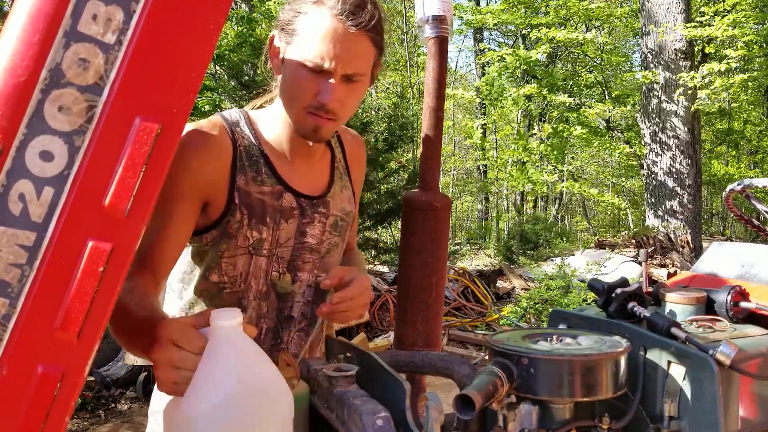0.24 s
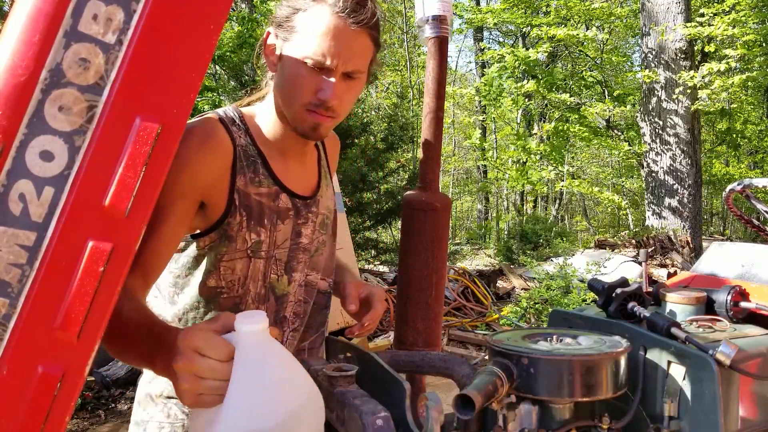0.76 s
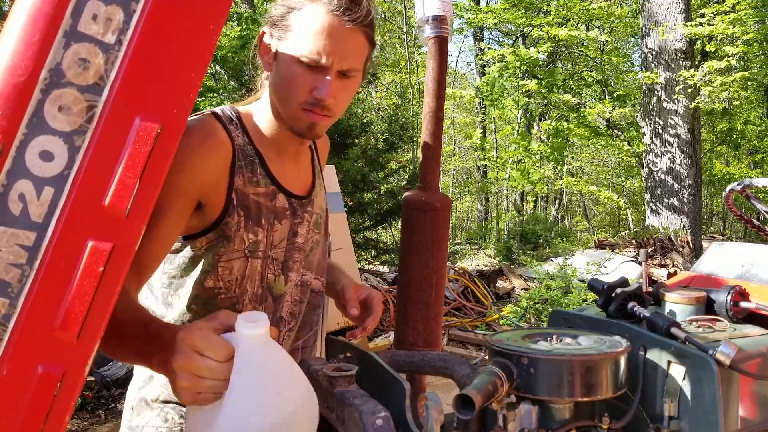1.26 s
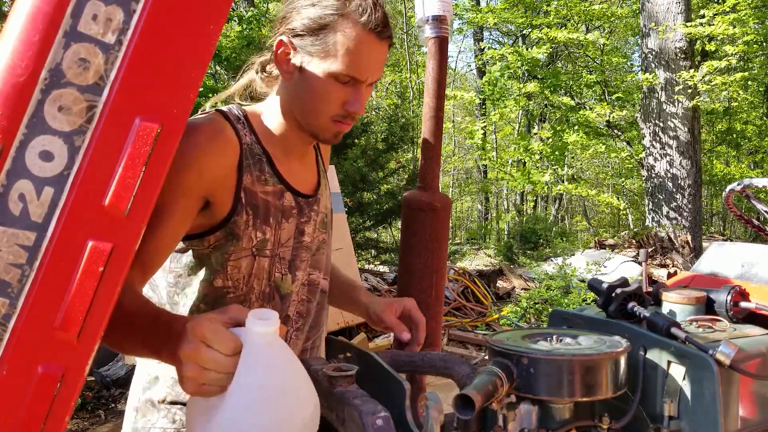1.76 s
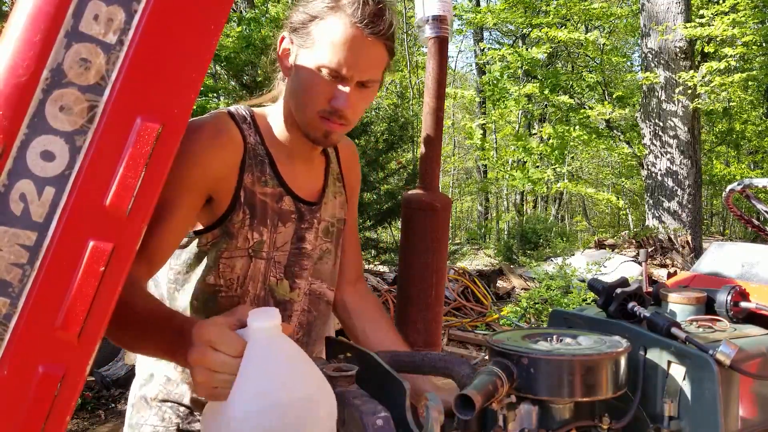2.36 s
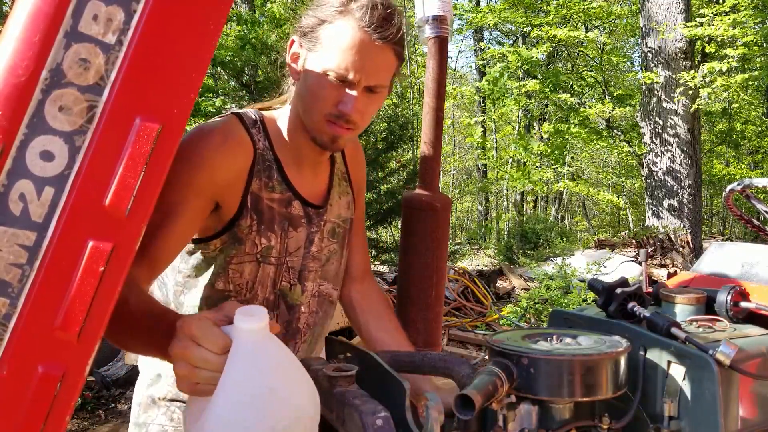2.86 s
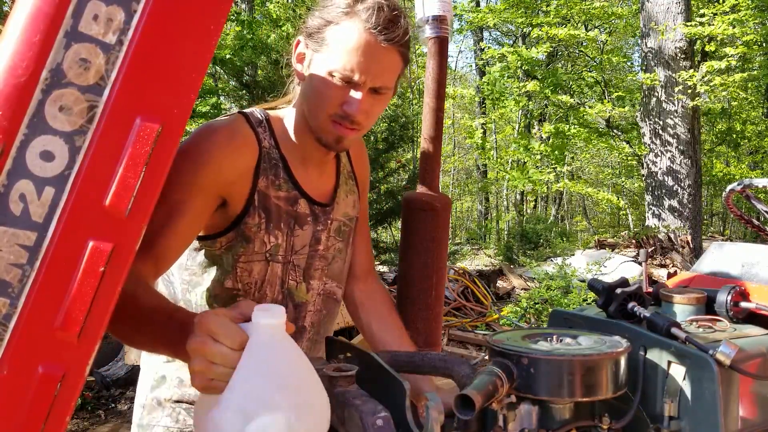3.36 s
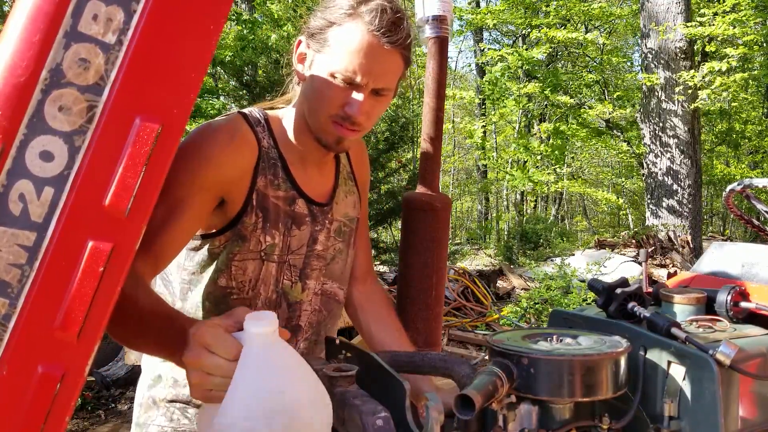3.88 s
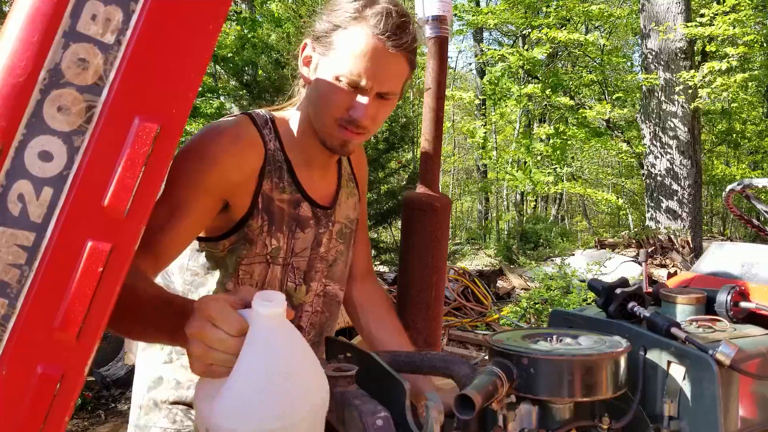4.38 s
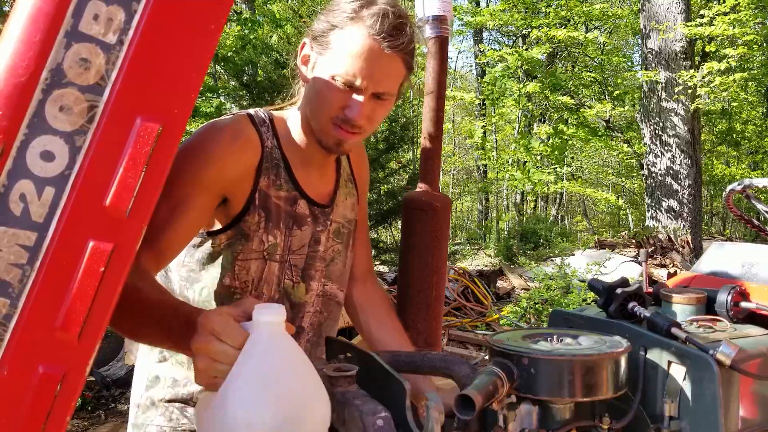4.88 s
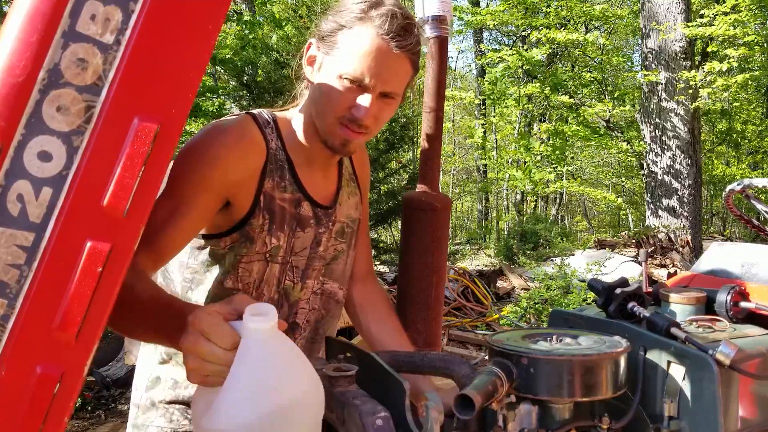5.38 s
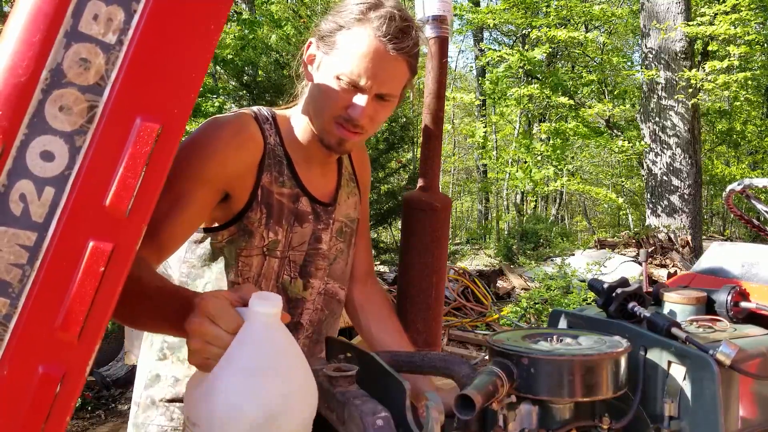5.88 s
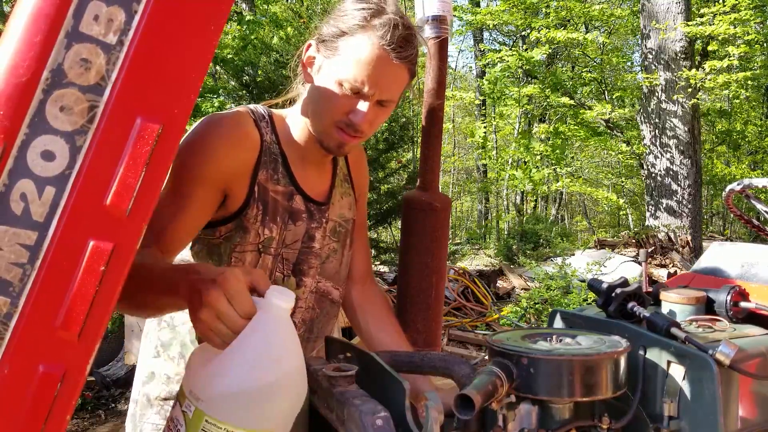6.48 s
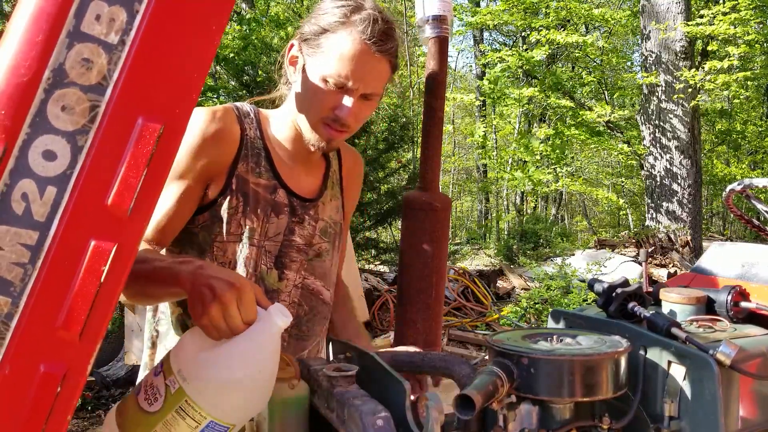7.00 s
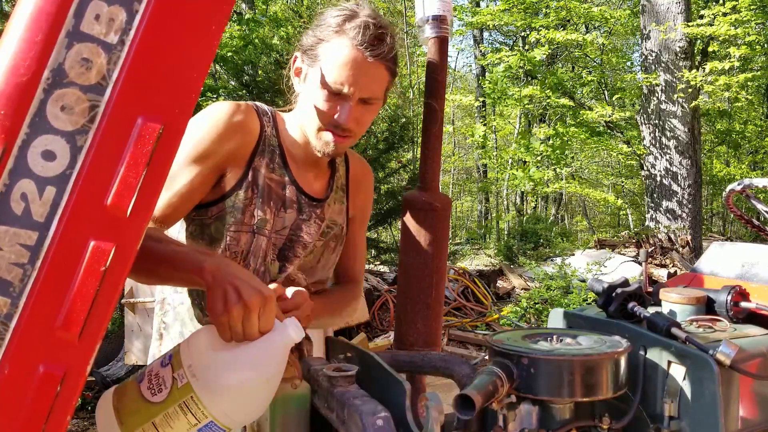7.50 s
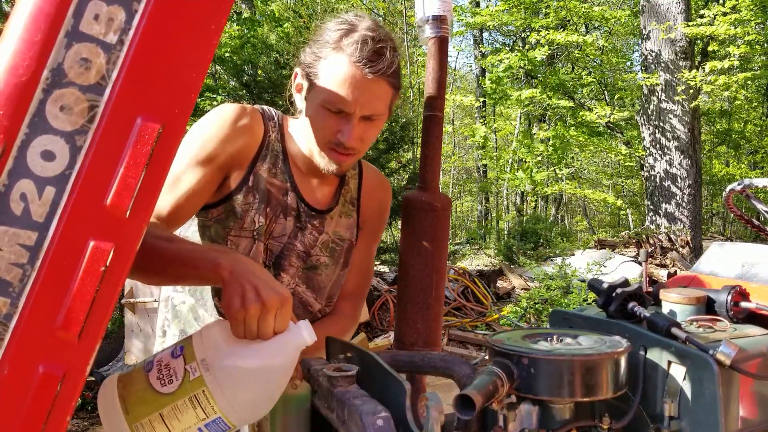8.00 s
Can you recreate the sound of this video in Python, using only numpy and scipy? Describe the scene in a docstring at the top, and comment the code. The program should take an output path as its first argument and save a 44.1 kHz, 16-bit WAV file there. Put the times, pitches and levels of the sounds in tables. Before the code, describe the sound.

A handheld plastic jug sloshes near the microphone, its waves breaking into ringing bubbles, plops and light foam fizz, with dull knocks of the plastic. Low wind gusts swell and buffet the microphone, strongest just before the sloshing ends. After a brief lull, a metal cap chatters onto a hollow hood with a sharp clank and short boom, leaving soft leaf rustle and thin bird chirps.

```python
"""Liquid swirled in a plastic jug slaps, bubbles and spatters about two and a half times a second:
swarms of ringing bubbles, bursts of noise and single plops follow each wave, over fizzing foam.
Then a metal cap is set down on a parked tractor's hood: a rattling clank of decaying modes and noise,
and a low boom. Outdoors behind it, shaped noise makes wind rumble on the microphone, leaf hiss, a faint
hum and blurred birdsong; gliding sines make a few thin chirps."""
import sys
import numpy as np
from scipy import signal
from scipy.fft import rfft, irfft, next_fast_len
from scipy.io import wavfile
from scipy.ndimage import uniform_filter1d

SR = 44100
rng = np.random.default_rng(int(sys.argv[2]) if len(sys.argv) > 2 else 0)


def unload_wav(signal):
    """Save mono or channel-first audio to the path in sys.argv[1] as 16-bit WAV at rate SR, clipped to [-1, 1]."""
    wavfile.write(
        sys.argv[1],
        SR,
        np.round(np.clip(np.atleast_2d(signal).T, -1, 1) * 32767).astype(np.int16),
    )


N = 363825
T = np.arange(N) / SR  # time in s

# colour of leaves and distant air: freq_hz, gain_db
LEAF_COLOUR = [(40, 7.5), (150, 5), (300, -0.5), (500, -3.5), (900, -3.5), (1400, -9), (2200, -15),
               (3000, -16), (4000, -13), (6000, -19.5), (8000, -24), (9800, -28.5), (11000, -36.5),
               (15500, -37.5)]
# slow drift of the breeze in the leaves: time_s, level_db
BREEZE = [(0, -52.5), (1, -50.5), (4.5, -50.5), (7.4, -51.5), (8.25, -53)]
# a faint hum that swells and fades: time_s, level_db
HUM_LEVEL = [(0, -65), (2, -63), (3, -58.5), (3.7, -53.5), (4.6, -53), (5.4, -67), (8.25, -67)]
# blurred phrases of a far bird: middle_s, half_length_s, level_db
SONG_PHRASES = [(0.684, 0.068, -63), (3.086, 0.18, -56.5), (4.98, 0.12, -59.5), (6.798, 0.046, -70)]
# thin falling bird notes: start_s, length_s, start_hz, end_hz, level_db
CHIRPS = [(0.274, 0.066, 7170, 6480, -49.5), (6.619, 0.097, 6630, 4840, -53.5),
          (7.984, 0.088, 7070, 5850, -53)]
# colour of the wind on the microphone: freq_hz, gain_db
WIND_COLOUR = [(10, -9), (25, 1), (55, -1), (75, -5), (100, -9.5), (140, -18.5), (200, -29), (300, -39),
               (500, -51), (1000, -63), (3000, -100)]
# strength of the wind before its flutter: time_s, level_db
GUSTS = [(0, -42.5), (1.0, -41), (1.25, -37), (1.8, -38.5), (2.25, -32.5), (2.9, -39), (3.05, -30),
         (3.95, -28.5), (4.1, -31.5), (4.6, -36.5), (4.9, -28), (5.5, -26), (6.1, -34), (6.6, -31.5),
         (7.0, -43), (7.3, -39), (7.7, -45), (8.25, -42)]
# single buffets of wind: middle_s, level_db
BUFFETS = [(0.16, -32), (0.535, -32), (3.16, -29.5), (3.68, -31), (5.335, -25), (5.9, -22.5), (6.34, -25)]
# the cap touches, tips over and shifts: start_s, force_db, hardness_db (of the bright crack)
CONTACTS = [(7.074, -35, 10), (7.079, -8, -7), (7.087, -5, 3.5), (7.090, 2, -1), (7.18, -35, 13),
            (7.295, -38, 10), (7.324, -33.5, 10.5)]
# ringing modes of cap and hood: freq_hz, level_db (relative), t60_s
RING_MODES = [(337, -25, 0.84), (555, -23, 0.43), (639, -28, 0.36), (715, -29, 0.26), (820, -13.5, 0.08),
              (917, -19, .13), (1160, -21, 0.12), (1232, -9, 0.086), (1402, -4, 0.13), (1454, -13, 0.072),
              (1710, -11, 0.068), (1890, -8, 0.034), (2078, -25, 0.11), (2360, -20, 0.21),
              (2564, -7.5, 0.059), (2840, -26, 0.079), (3200, -35, 0.088), (3710, -19.5, 0.063),
              (4301, -22, 0.098), (5300, -40, .1)]
# colour of each metal contact: freq_hz, gain_db
CRACK_COLOUR = [(100, -28), (350, -1), (600, -10), (900, 1.5), (1800, 2), (2700, -3), (3400, -9),
                (5800, -12), (8500, -20), (11000, -32), (15000, -47)]
# dull body of the hood under the blows: freq_hz, gain_db
THUD_COLOUR = [(80, -7), (210, -1), (340, 5), (480, 0), (700, -2), (900, -16), (1300, 0), (2000, -26),
               (5000, -43)]
# the jug's wall buckles with a soft low thump: start_s, level_db
THUMPS = [(2.517, -38.5), (2.868, -41), (2.955, -45), (3.276, -44.5), (3.641, -51), (3.731, -39),
          (4.396, -44), (4.537, -40), (5.895, -61)]
# the loudest plops: start_s, level_db, pitch_hz, spatter_db (relative to level_db)
PLOPS = [(0.407, -34.5, 4450, -23), (0.5566, -27, 2620, -22.5), (0.7886, -34.5, 1285, -12),
         (0.819, -31, 2350, -32), (0.9173, -32, 1770, -18), (1.254, -31.5, 1097, -20),
         (1.3089, -30.5, 4000, -20), (1.3244, -31, 3000, -31), (1.3823, -35, 1585, -19),
         (1.6357, -35, 1450, -10.5), (1.702, -31, 3560, -24), (1.729, -30, 3800, -30),
         (1.7699, -32, 3460, -27), (1.7998, -26.5, 2030, -15.5), (1.8124, -36, 1020, -8),
         (1.8314, -31.5, 3180, -24), (1.8916, -28.5, 2090, -18.5), (2.0657, -35.5, 2510, -9),
         (2.1001, -30.5, 2350, -16), (2.1161, -28, 3300, -33), (2.138, -29.5, 1390, -11),
         (2.3835, -32.5, 3770, -34), (2.5202, -31, 2420, -19), (2.9582, -43.5, 1050, -5.5),
         (3.1433, -31.5, 4050, -36), (3.268, -26.5, 2300, -30), (3.3782, -39.5, 3070, -5.5),
         (3.5254, -46, 1080, 1), (3.5643, -30, 1480, -17), (3.6401, -38, 990, -3),
         (3.9025, -32, 2620, -5.5), (4.0058, -31.5, 2400, -13.5), (4.1185, -39.5, 2570, -5.5),
         (4.338, -24.5, 3450, -34), (4.3974, -26.5, 3700, -17.5), (4.5166, -35.5, 1255, -35),
         (4.6843, -34.5, 1084, -15), (4.9871, -41, 2270, -4.5), (5.1173, -40.5, 2220, -0.5),
         (5.1442, -31, 2910, -29), (5.3373, -31, 3900, -13), (5.6755, -41, 7350, -6.5),
         (6.0387, -45.5, 3750, -1.5), (6.1654, -31.5, 1490, -24)]
# colour of the fine spatter of a drip: freq_hz, gain_db
SPATTER_COLOUR = [(200, -29), (700, 1.5), (2000, 3), (4500, 9.5), (8500, 1), (10500, -13), (15000, -31)]
# one wave breaks at each swing of the jug: crest_s, level_db, half_length_s
SLOSHES = [(0.427, -51.5, 0.059), (0.822, -50, 0.033), (1.286, -43, 0.02), (1.716, -41, .032),
           (2.112, -45, 0.06), (2.483, -44, 0.05), (2.857, -42.5, 0.046), (3.239, -43.5, 0.044),
           (3.602, -41.5, 0.048), (3.998, -44.5, 0.04), (4.387, -43.5, 0.037), (4.721, -45, 0.057),
           (5.069, -46, 0.08), (5.381, -48.5, 0.1), (5.762, -46.5, 0.054), (6.104, -51, 0.036)]
# colour of the splashing through the jug wall: freq_hz, gain_db
SPLASH_COLOUR = [(200, -24), (600, -4), (1000, -3.5), (1400, 3.5), (1900, 0.5), (2500, 2.5), (3800, 3.5),
                 (5500, -10), (8500, -6), (10500, -15.5), (15000, -36)]
# colour of the spray thrown by a breaking wave: freq_hz, gain_db
SPRAY_COLOUR = [(300, -2), (800, 1), (2500, 0.5), (5000, 4), (8500, -8), (11000, -18), (15000, -27)]
# low gulp of the liquid and the jug's walls: freq_hz, gain_db
GULP_COLOUR = [(100, -26), (220, -5.5), (300, 6.5), (420, -11), (700, -6), (1000, -7.5), (2000, -27),
               (6000, -45)]
# colour of the foam: freq_hz, gain_db
FOAM_COLOUR = [(300, -16), (900, -6.5), (2400, 2), (4000, 0), (6000, -7), (8500, -12), (11000, -30),
               (15000, -36)]

# the cap lands on its rim and chatters, each bounce weaker and duller than the last
LAND_S, LAND_DB, LAND_HARD_DB = 7.0929, 2.5, 0
BOUNCE_S, BOUNCE_LOSS_DB, BOUNCE_DULL_DB = 0.005, 0.85, 1.6  # spacing, and losses per bounce
CAP_HZ = 1344  # the cap's main note
# drips around each wave: count, time span, level above the wave's, pitch range, spatter
DRIPS_PER_WAVE, DRIP_EARLY_S, DRIP_LATE_S = 6, 0.06, 0.15
DRIP_DB, DRIP_SPREAD_DB = 1.5, 1.5
DRIP_LOW_HZ, DRIP_HIGH_HZ, DRIP_SPATTER_DB = 948, 5020, -18
# a wave falls in a fraction of its rise, then drains off the wall
COLLAPSE, DRAIN_DB, DRAIN_S = 0.8, -15, 0.12
# foam: full level, first level relative to it, build-up time, fade after the last wave
FOAM_DB, FOAM_START_DB, FOAM_BUILD_S, FOAM_FADE_DB_PER_S = -58, -7.5, 3.3, 20
EDGE_HZ = 15700  # upper band limit


def amp(db):
    """Decibels to gain."""
    return 10 ** (np.asarray(db) / 20)


def unit(x):
    """Scales to rms 1."""
    return x / np.sqrt(np.mean(x ** 2) + 1e-20)


def level(curve):
    """Gain over time from rows of time_s, level_db."""
    return amp(np.interp(T, *np.transpose(curve)))


def swell(s, half_s):
    """A bell-shaped rise and fall around time s."""
    return np.exp(-0.5 * np.minimum(((T - s) / half_s) ** 2, 100))


def add(mix, s, sound):
    """Mixes a sound in at time s."""
    part = mix[max(round(s * SR), 0):][:len(sound)]
    part += sound[:len(part)]


def colour(x, spectrum):
    """Filters by rows of freq_hz, gain_db, keeping the power of white noise."""
    size = next_fast_len(len(x))
    hz, db = np.transpose(spectrum)
    bins_hz = np.fft.rfftfreq(size, 1 / SR)
    gain = amp(np.interp(np.log(bins_hz + 1), np.log(hz), db))
    return irfft(rfft(x, size) * unit(gain), size)[:len(x)]


def band(hz, width_hz):
    """Noise in one bell-shaped band; around 0 Hz it is a wander up to about the width."""
    size = next_fast_len(N)
    bell = np.exp(-0.5 * ((np.fft.rfftfreq(size, 1 / SR) - hz) / width_hz) ** 2)
    return unit(irfft(rfft(rng.standard_normal(size)) * bell, size)[:N])


def echo(x, t60, wet_db):
    """Adds a dense noise tail of reflections that falls 60 dB in t60 seconds."""
    t = T[:SR // 2]
    tail = rng.standard_normal(len(t)) * amp(-60 * t / t60) * (t > 0.001)
    return x + amp(wet_db) * signal.oaconvolve(x, tail / np.linalg.norm(tail))[:N]


def woods():
    """Leaf hiss, a wavering hum over a soft drone, and far birdsong, all from shaped noise."""
    flicker = amp(0.37 * band(0, width_hz=3.2))
    leaves = colour(rng.standard_normal(N), LEAF_COLOUR) * level(BREEZE) * flicker
    hum = band(275.1, width_hz=5.9) + amp(-1.0) * band(246, width_hz=120)
    phrases = sum(amp(db) * swell(s, half_s) for s, half_s, db in SONG_PHRASES)
    song = phrases * band(3700, width_hz=470) * amp(1.7 * band(0, width_hz=12))
    return leaves + level(HUM_LEVEL) * hum + song


def chirps(bend=1.72, waver_hz=60):
    """Near-pure notes that bend downwards, smeared by the trees."""
    out, waver = np.zeros(N), band(0, width_hz=300)
    for s, length_s, start_hz, end_hz, db in CHIRPS:
        u = np.linspace(0, 1, round(length_s * SR))  # progress through the note
        hz = start_hz + (end_hz - start_hz) * u ** bend + waver_hz * waver[:len(u)]
        envelope = 2 * np.sqrt(u) * (1 - u)
        add(out, s, amp(db) * envelope * np.sin(2 * np.pi * np.cumsum(hz) / SR))
    return echo(out, t60=0.48, wet_db=-3.5)


def wind(flutter_db=1.65, flutter_hz=5, buffet_half_s=0.024):
    """Low turbulence on the microphone follows the gusts, flutters and leaps in a few buffets."""
    eddies = colour(rng.standard_normal(N), WIND_COLOUR)
    # even out the noise's own slow swells
    steady = eddies / np.sqrt(uniform_filter1d(eddies ** 2, size=5000))
    gusts = level(GUSTS) * amp(flutter_db * band(0, width_hz=flutter_hz))
    buffets = sum(amp(db) * swell(s, buffet_half_s) for s, db in BUFFETS)
    return np.hypot(gusts, buffets) * steady


def boom(hz=172, db=-25, t60=0.29, at=7.128, rise_s=0.0045, linger_db=-22, linger_t60=2.14):
    """The hood panel swells into a low boom just after the clank, with a fast and a slow decay."""
    since = T - at
    rise = (1 + np.tanh(since / rise_s / 2)) / 2
    age = np.maximum(since, 0)
    fade = amp(-60 * age / t60) + amp(linger_db - 60 * age / linger_t60)
    return amp(db) * rise * fade * np.sin(2 * np.pi * hz * T)


def chatter(count=6):
    """The bounces of the cap on its rim, as rows like those of the contacts."""
    return [(LAND_S + k * BOUNCE_S, LAND_DB - k * BOUNCE_LOSS_DB, LAND_HARD_DB - k * BOUNCE_DULL_DB)
            for k in range(count)]


def stored(energy, seconds):
    """Amplitude that blows leave in a resonator, decaying by 1/e in the given seconds."""
    held = np.sqrt(signal.lfilter([1], [1, -np.exp(-2 / (seconds * SR))], energy + 1e-20))
    return uniform_filter1d(held, size=12)  # each contact takes a moment


def clank(ring_db=-26, crack_db=-25, crack_s=0.0055, thud_db=-33, thud_s=0.0035,
          cap_db=-28.0, cap_t60=0.13, linger_db=-50, linger_t60=0.8):
    """Every contact cracks, thuds and feeds the modes; the cap's main note lingers on."""
    blows, hard_blows = np.zeros((2, N))
    for s, db, hard_db in CONTACTS + chatter():
        blows[round(s * SR)] += amp(db) ** 2
        hard_blows[round(s * SR)] += amp(db + hard_db) ** 2

    per_t60 = 1 / np.log(1000)  # t60 to 1/e decay time
    ring = sum(amp(db) * stored(blows, t60 * per_t60) * np.sin(2 * np.pi * hz * T)
               for hz, db, t60 in RING_MODES)
    note = amp(cap_db) * stored(blows, cap_t60 * per_t60)
    note = note + amp(linger_db) * stored(blows, linger_t60 * per_t60)
    crack = stored(hard_blows, crack_s) * colour(rng.standard_normal(N), CRACK_COLOUR)
    crack = echo(crack, t60=0.55, wet_db=-12.5)
    thud = stored(blows, thud_s) * colour(rng.standard_normal(N), THUD_COLOUR)
    thud = echo(thud, t60=0.92, wet_db=-1.0)
    tones = amp(ring_db) * ring + note * np.sin(2 * np.pi * CAP_HZ * T)
    return tones + amp(crack_db) * crack + amp(thud_db) * thud


def snap(at=6.3465, db=-38, fade_s=0.017, rise_s=0.0006):
    """A short noise snap from the plastic as the jug is lifted."""
    out, t = np.zeros(N), T[:SR // 8]
    envelope = np.exp(-t / fade_s) * (1 - np.exp(-t / rise_s))
    add(out, at, amp(db) * colour(rng.standard_normal(len(t)), SPRAY_COLOUR) * envelope)
    return out


def thumps(hz=290, ring_s=0.022, knock_s=0.016, knock_db=-3):
    """A dull knock on the plastic sets the air in the jug ringing for a moment."""
    out, t = np.zeros(N), T[:SR // 10]
    for s, db in THUMPS:
        air_hz = hz * rng.uniform(1.0, 1.07)
        air = np.exp(-t / ring_s) * np.sin(2 * np.pi * air_hz * t)
        noise = colour(rng.standard_normal(len(t)), GULP_COLOUR)
        knock = amp(knock_db) * np.exp(-t / knock_s) * noise
        add(out, s, amp(db) * (air + knock))
    return out


def bubble(hz, cycles, glide):
    """A trapped bubble rings, fading by 1/e in some cycles, and rises in pitch as it nears the surface."""
    age = T[:SR // 20] * hz / cycles
    return np.exp(-age) * np.sin(2 * np.pi * cycles * (age + glide * (age - 1 + np.exp(-age))))


def bubbles(rate, spread_db, spectrum):
    """A random swarm of bubbles of many sizes; rate sets the crowding, in nominal bubbles a second."""
    swarm = np.zeros(N)
    for hz in np.geomspace(700, 12000, 28):
        chance = rate * np.sqrt(hz / 3000) / 28 / SR  # small bubbles are more common
        born = np.flatnonzero(rng.random(N) < chance)
        clicks = np.zeros(N)
        clicks[born] = amp(spread_db * np.minimum(rng.exponential(1, N)[born], 3))
        ringing = bubble(hz * rng.uniform(1.0, 1.04), cycles=7.8, glide=0.054)
        swarm += hz ** 0.75 * signal.oaconvolve(clicks, ringing)[:N]
    return unit(colour(swarm, spectrum))


def drips():
    """Small drips scattered at random around each wave, as rows like those of the plops."""
    rows = []
    for s, db, _ in SLOSHES:
        for when, size, pitch, wet in rng.random((DRIPS_PER_WAVE, 4)):
            start_s = s - DRIP_EARLY_S + when * (DRIP_EARLY_S + DRIP_LATE_S)
            level_db = db + DRIP_DB + DRIP_SPREAD_DB * (2 * size - 1)
            pitch_hz = DRIP_LOW_HZ * (DRIP_HIGH_HZ / DRIP_LOW_HZ) ** pitch
            rows.append((start_s, level_db, pitch_hz, DRIP_SPATTER_DB + 6 * (2 * wet - 1)))
    return rows


def plops(spatter_s=0.0015, spatter_db=-8, bubble_db=-6.3, pop_db=-10, pop_s=0.0067,
          slap_db=-17, rise_s=0.00035):
    """A large bubble rings amid a rough pop near its pitch, a flurry of tiny ones and a slap on the wall."""
    out, t = np.zeros(N), T[:SR // 20]
    droplets = bubbles(rate=4500, spread_db=3.5, spectrum=SPATTER_COLOUR)
    flurry = t / spatter_s * np.exp(1 - t / spatter_s)
    for s, db, hz, splash_db in list(PLOPS) + drips():
        pop_noise, slap_noise = rng.standard_normal((2, len(t)))
        size_hz = rng.uniform(3700, 10300)  # each flurry has its own droplet size
        drops = colour(droplets[round(s * SR):][:len(t)],
                       [(size_hz / 2, -5), (size_hz, 0), (size_hz * 1.3, -4)])
        spatter = amp(splash_db + spatter_db) * unit(flurry * drops)
        near_pitch = [(hz / 5, -20), (hz / 2, -7), (hz, 0), (hz * 2, -10), (hz * 4, -36)]
        pop = amp(pop_db) * colour(pop_noise, near_pitch)
        slap = amp(slap_db) * colour(slap_noise, GULP_COLOUR)
        tone = amp(bubble_db) * bubble(hz, cycles=10.1, glide=0.037)
        body = (tone + (pop + slap) * np.exp(-t / pop_s)) * (1 - np.exp(-t / rise_s))
        add(out, s, amp(db) * (body + spatter))
    return out


def waves():
    """Strength of the splashing: each wave builds, collapses and drains."""
    power = np.zeros(N)
    for s, db, half_s in SLOSHES:
        crest = swell(s, np.where(T < s, half_s, half_s * COLLAPSE))
        drain = amp(DRAIN_DB) * np.exp(-abs(T - s) / DRAIN_S) * (T > s)
        power += (amp(db) * np.maximum(crest, drain)) ** 2
    return np.sqrt(power)


def froth():
    """Amount of foam: it builds while the liquid is swirled and dies after the last wave."""
    building = FOAM_START_DB * np.maximum(1 - T / FOAM_BUILD_S, 0)
    dying = FOAM_FADE_DB_PER_S * np.maximum(T - SLOSHES[-1][0], 0)
    return amp(FOAM_DB + building - dying)


def sloshes():
    """Each wave breaks into a crowd of bubbles, spray and a low gulp; foam fizzes in between."""
    crowd = bubbles(rate=1800, spread_db=9.0, spectrum=SPLASH_COLOUR)
    spray = colour(rng.standard_normal(N), SPRAY_COLOUR) * amp(2.5 * band(0, width_hz=66))
    gulp = colour(rng.standard_normal(N), GULP_COLOUR)
    foam = bubbles(rate=1200, spread_db=4.5, spectrum=FOAM_COLOUR)
    splash = amp(-5.5) * crowd + amp(-10.5) * spray + amp(-13.0) * gulp
    return waves() * splash + froth() * foam


def scene():
    """The liquid and the snap ring briefly inside the jug; everything else is mixed around them."""
    jug = echo(sloshes() + plops() + snap(), t60=0.077, wet_db=-7.5) + thumps()
    return (jug + clank() + boom() + wind() + woods() + chirps())[None]


def record(dry):
    """The recorder's band limit, a steep low-pass."""
    lowpass = signal.firwin(511, EDGE_HZ, window=("kaiser", 9), fs=SR)
    return signal.oaconvolve(dry, lowpass[None], "same")


dry = scene()
out = record(dry)
unload_wav(out)
```